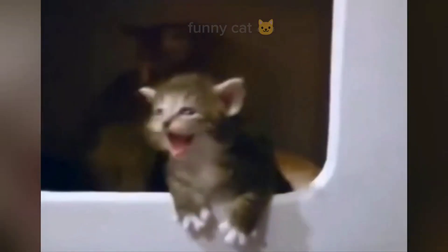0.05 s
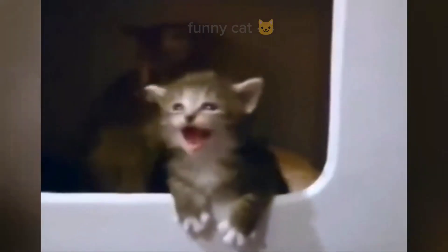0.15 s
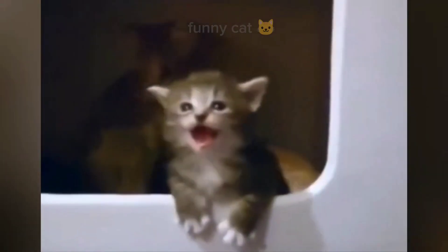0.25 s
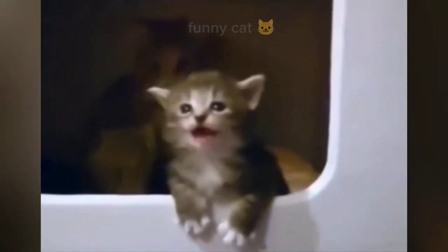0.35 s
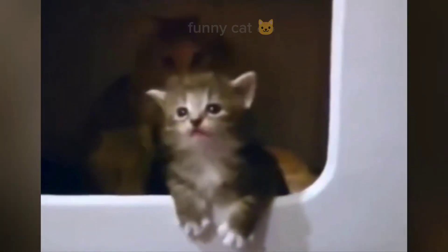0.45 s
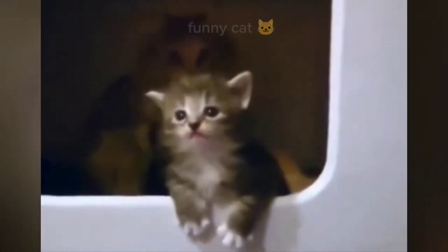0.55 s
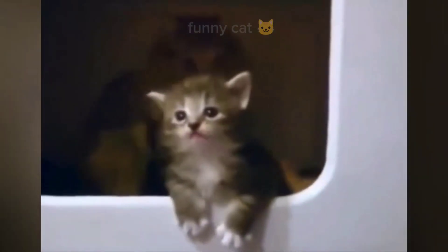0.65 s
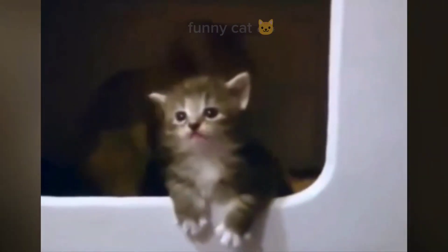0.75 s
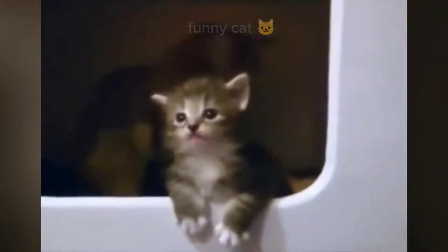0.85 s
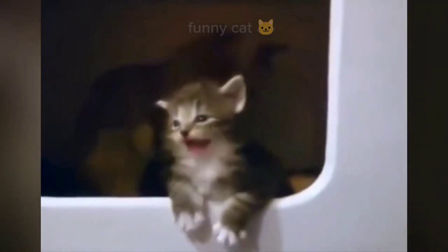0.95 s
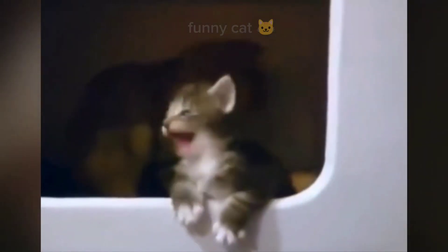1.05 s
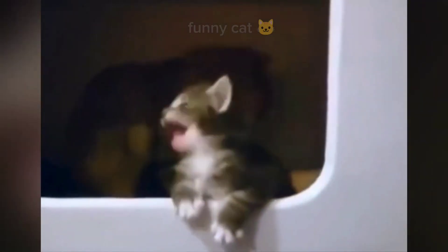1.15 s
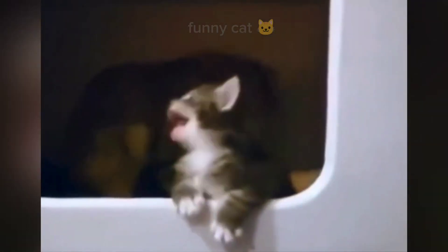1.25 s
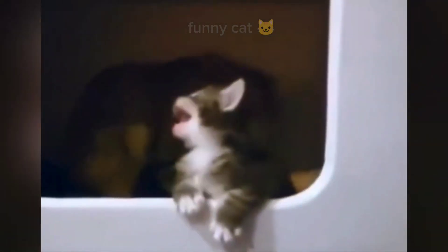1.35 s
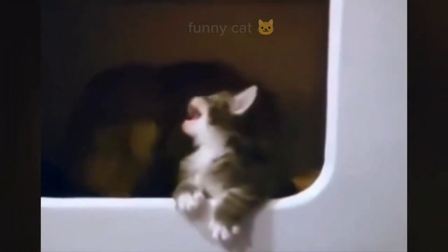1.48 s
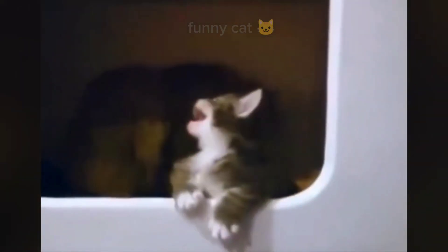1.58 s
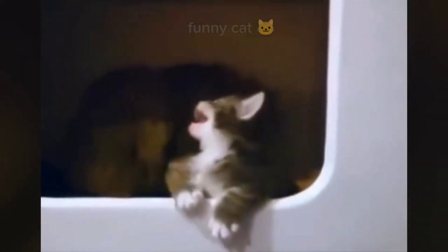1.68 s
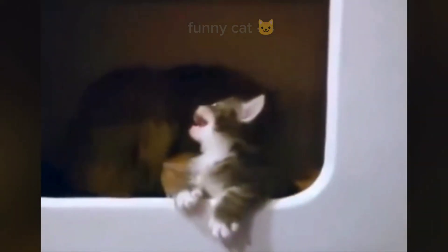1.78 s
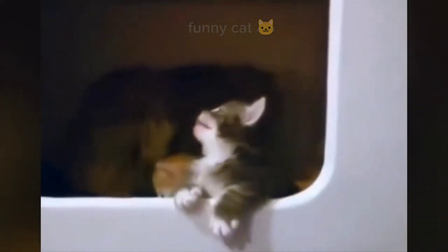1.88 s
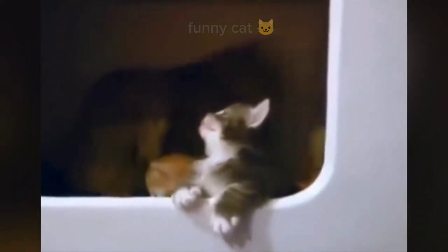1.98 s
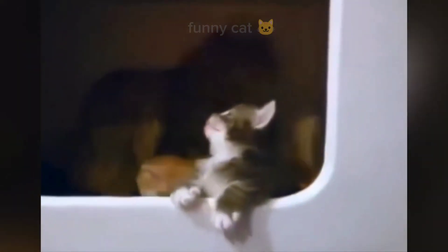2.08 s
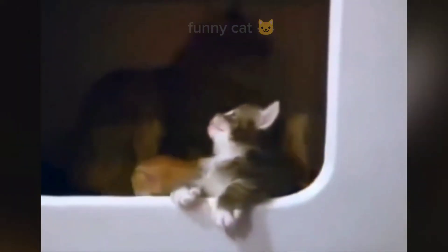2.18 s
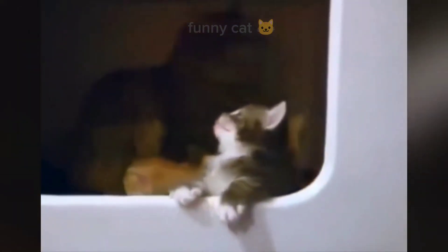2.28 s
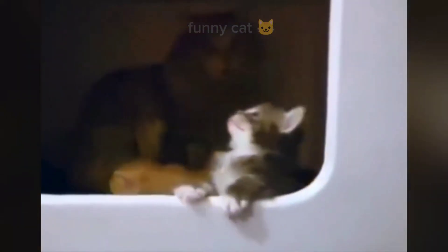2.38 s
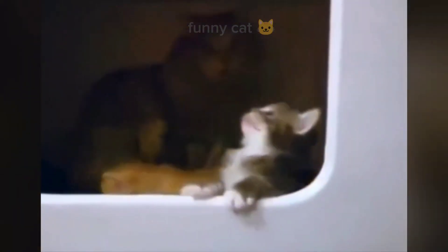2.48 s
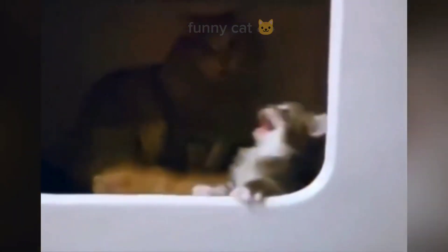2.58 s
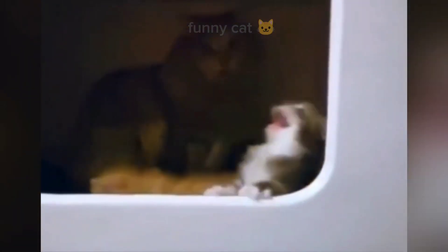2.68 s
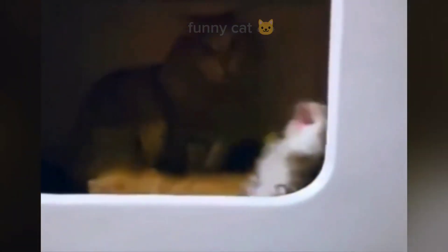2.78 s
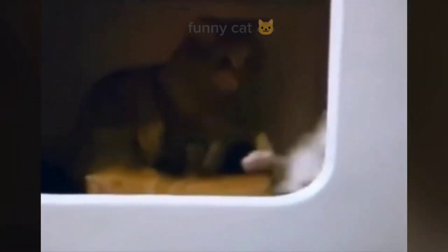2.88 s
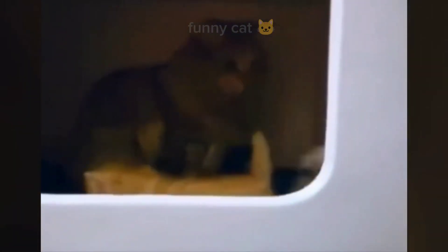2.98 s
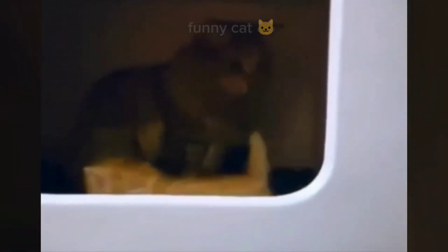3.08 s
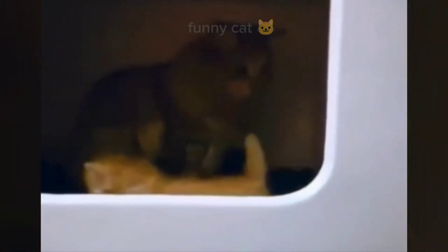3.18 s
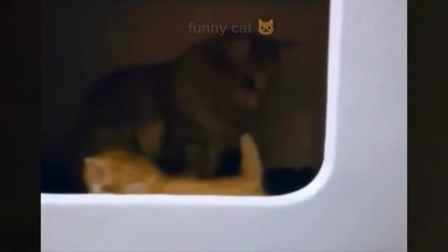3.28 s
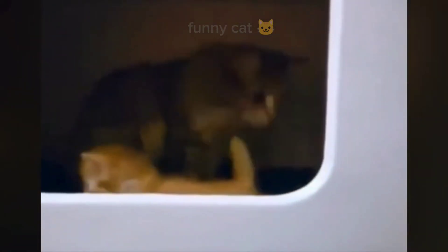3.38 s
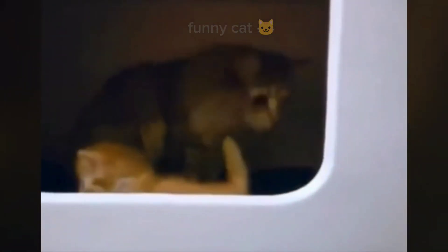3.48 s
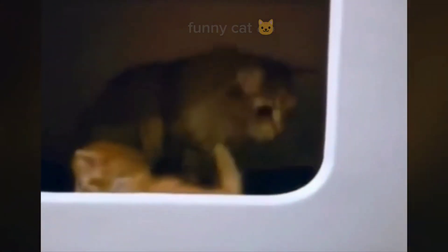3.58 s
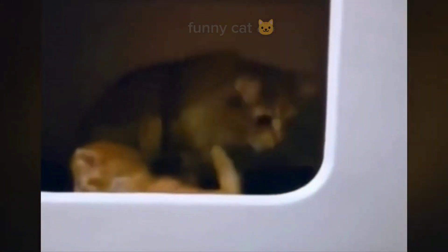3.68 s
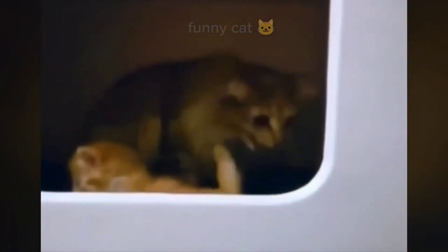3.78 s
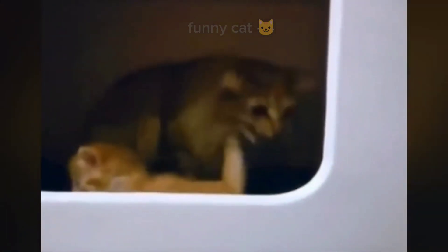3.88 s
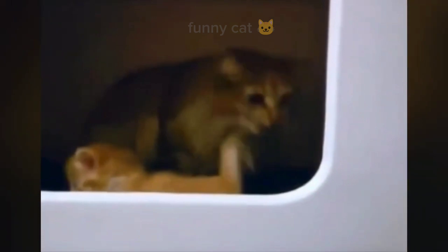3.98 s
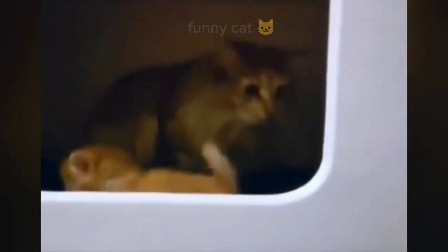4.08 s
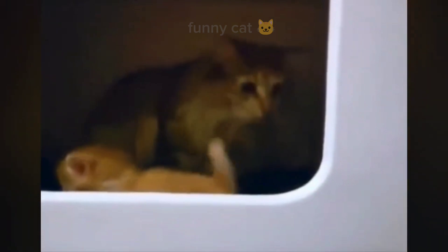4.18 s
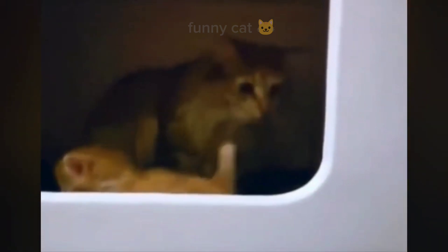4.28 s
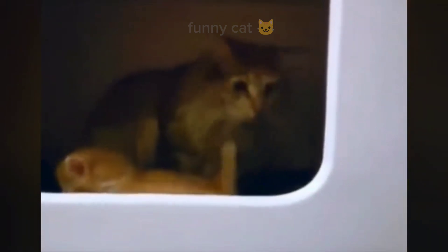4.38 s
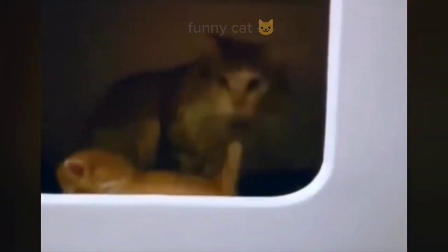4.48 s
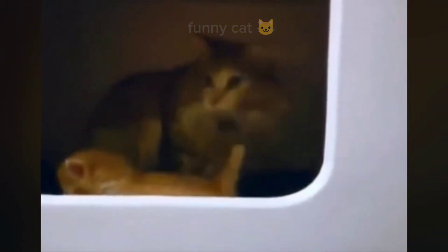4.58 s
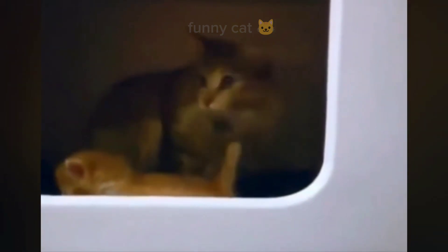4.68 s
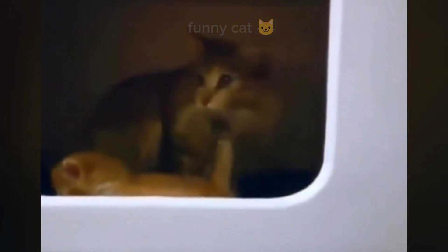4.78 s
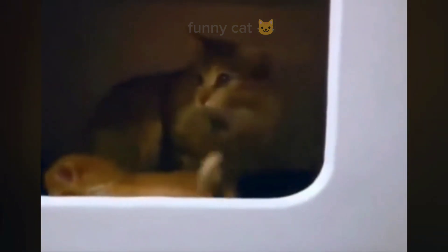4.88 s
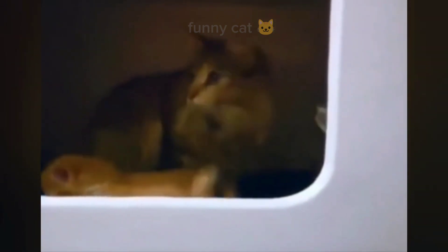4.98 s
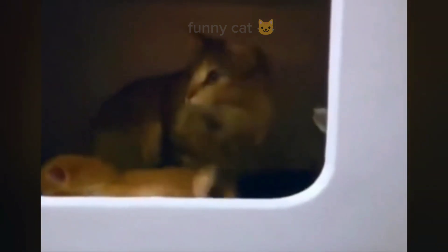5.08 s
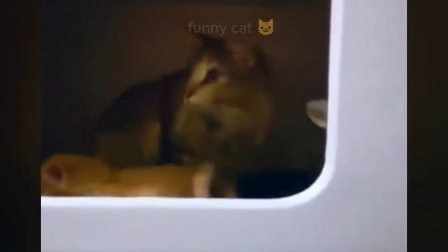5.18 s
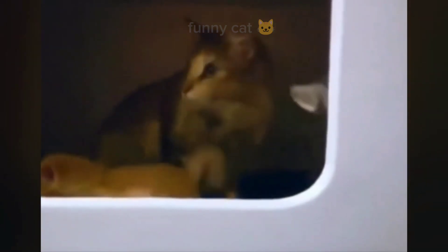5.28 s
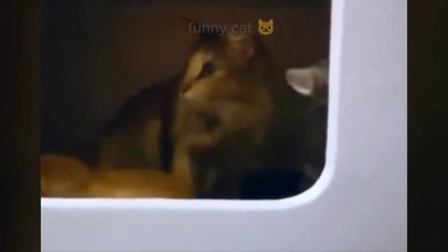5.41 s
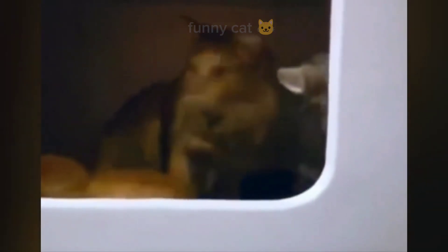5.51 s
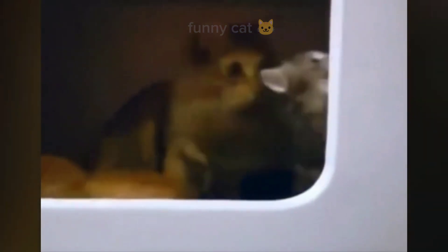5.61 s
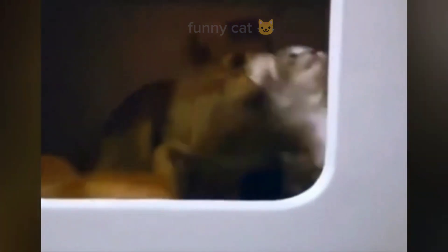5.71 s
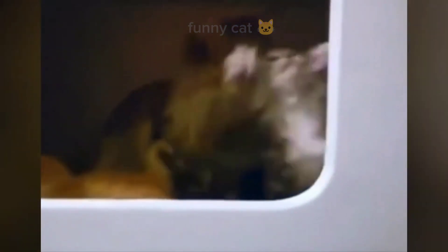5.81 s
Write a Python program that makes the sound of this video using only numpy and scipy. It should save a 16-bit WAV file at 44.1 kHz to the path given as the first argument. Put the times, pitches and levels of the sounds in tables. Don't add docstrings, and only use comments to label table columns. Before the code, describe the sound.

High piercing kitten cries glide up and crack, with fainter kitten answers, a closed-mouth cat trill, soft box thumps and faint hum.

```python
import sys
import numpy as np
from scipy import signal
from scipy.fft import rfft, irfft, next_fast_len
from scipy.io import wavfile
from scipy.ndimage import uniform_filter1d, minimum_filter1d

SR = 44100
rng = np.random.default_rng(int(sys.argv[2]) if len(sys.argv) > 2 else 0)


def amp(db):
    return 10 ** (np.asarray(db, float) / 20)


def write(x):
    x = np.atleast_2d(x).T
    wavfile.write(sys.argv[1], SR, np.round(np.clip(x, -1, 1) * 32767).astype(np.int16))


N = 257984
T = np.arange(N) / SR


def at_hz(points, hz):
    return np.interp(np.log(hz), np.log(np.array(points)[:, 0]), np.array(points)[:, 1])


def rms_one(x):
    return x / np.sqrt(np.mean(x ** 2) + 1e-20)


def drift(rate_hz, size=N):
    r = np.exp(-2 * np.pi * rate_hz / SR)
    settle = 9000
    slow = signal.lfilter([1], [1, -2 * r, r * r], rng.standard_normal(size + settle))
    return rms_one(slow[settle:])


def cycle_phase(hz, jitter):
    return 2 * np.pi * np.cumsum(hz * (1 + jitter)) / SR


def unroll(rows, fade_s):
    s, *columns = np.transpose(rows)
    first, last = s[0] - fade_s, s[-1] + fade_s
    span = slice(max(int(first * SR), 0), min(int(last * SR), N))
    gate = np.interp(T[span], [first, s[0], s[-1], last], [0, 1, 1, 0])
    return span, gate, [np.interp(T[span], s, c) for c in columns]


def partial(phase, db, pan_db, lead_rad):
    left = np.sqrt(1 / (1 + amp(-pan_db) ** 2))
    right = np.sqrt(1 - left ** 2)
    return 2 * amp(db) * np.array([left * np.sin(phase + lead_rad / 2), right * np.sin(phase - lead_rad / 2)])


def coloured(spectrum, patchy_db):
    # frequency in Hz, likeness from -1 to 1.
    likeness = [(60, 1), (280, 0.21), (600, 0.33), (1300, .1), (13000, 0.048)]
    edges_hz = 37.5 * 2 ** np.arange(0, 8.6, .5)
    white = rng.standard_normal((2, 2, N))
    bands = []
    for k, (low, high) in enumerate(zip(edges_hz, edges_hz[1:])):
        centre_hz = np.sqrt(low * high)
        sos = signal.butter(2, [low, high], "band", fs=SR, output="sos")
        mid, side = signal.sosfilt(sos, white[k % 2])
        alike = np.clip(at_hz(likeness, centre_hz), -1, 1)
        gain = amp(at_hz(spectrum, centre_hz) + patchy_db * drift(31))
        bands.append(gain * (np.sqrt(1 + alike) * mid + np.sqrt(1 - alike) * side * [[1], [-1]]))
    return sum(bands) / np.std(sum(bands[8:]))


def scoop(start_s, end_s, low_hz, top_hz, peak_db):
    # share of length, share of climb, effort in dB, mouth opening in dB.
    scoop_shape = [(0, 0.041, -28.5, 6), (.25, .26, -18, 5), (.6, .65, -10.5, 14.5),
                   (0.861, .91, -2.5, 15.5), (.999, 0.98, -12.5, 8)]
    return [(start_s + u * (end_s - start_s), low_hz + climb * (top_hz - low_hz), peak_db + effort, mouth)
            for u, climb, effort, mouth in scoop_shape]


def kitten():
    # start in seconds, end in seconds, from Hz, to Hz, peak in dB.
    scoops = [
        (0.079, 0.176, 962, 1860, -36),
        (1.269, 1.429, 755, 1790, -32.5),
        (2.901, 2.988, 1014, 1745, -34),
        (4.393, 4.507, 1055, 1721, -35.5),
    ]
    # time in seconds, pitch in Hz, effort in dB, mouth in dB.
    holds = [
        [(.17, 1277, -43, 1.5), (.23, 1371, -47, 16.5), (.248, 1513, -32, 6.5), (.29, 1563, -31, 9.5),
         (.36, 1511, -25, 16.5), (.389, 1503, -31.5, 23), (.41, 1477, -29.5, 17), (.447, 1416, -35.5, 30),
         (.469, 1377, -36.5, 24.5)],
        [(1.418, 1297, -60.5, 22.5), (1.439, 1310, -40.5, 12), (1.5, 1413, -41, 17.5),
         (1.556, 1494, -41.5, 26.5), (1.607, 1462, -40.5, 29.5), (1.685, 1425, -37.5, 27),
         (1.706, 1402, -32.5, 24.5), (1.715, 1406, -55, 16)],
        [(2.985, 1207, -61, 21), (3.012, 1347, -37, 7), (3.054, 1417, -40, 19.5), (3.12, 1429, -42.5, 28),
         (3.185, 1403, -39, 29.5), (3.23, 1387, -37, 26), (3.262, 1346, -44.5, 29), (3.297, 1332, -48.5, 26.5)],
        [(4.505, 1166, -58, 15.5), (4.562, 1173, -62, 26), (4.619, 1238, -44.5, -5), (4.645, 1178, -45.5, 10.5),
         (4.668, 1175, -54, 30.5), (4.688, 1200, -45, 5), (4.757, 1105, -44, 0), (4.82, 844, -58, -32)],
    ]
    # time in seconds, pitch in Hz, effort, mouth in dB.
    closings = [
        [(.472, 1575, -28, 3), (.508, 1596, -26, -5), (.55, 1535, -27.5, -9.5), (.6, 1522, -25, -23),
         (.622, 1650, -24, -22), (.648, 1785, -16, -28), (.682, 1640, -27.5, -18), (.705, 1450, -36.5, -3.5),
         (.73, 1200, -59, 13)],
        [(1.716, 1634, -26.5, -8), (1.755, 1592, -36, 3.5), (1.785, 1494, -46.5, 13.5), (1.821, 1474, -36, 4.5),
         (1.941, 1406, -36.5, -1.5), (1.965, 1329, -46.5, 9), (2.061, 1233, -42.5, -3), (2.148, 1100, -49, 11),
         (2.208, 1078, -49.5, 7)],
        [(2.203, 1347, -51, 9.5), (2.22, 1260, -55, 15.5), (2.235, 1134, -67, 2)],
        [(3.298, 1429, -47.5, 26.5), (3.322, 1425, -47, 21.5), (3.345, 1410, -45, 15.5), (3.385, 1404, -45, 5),
         (3.435, 1386, -36, -0.5), (3.466, 1263, -48, 5), (3.523, 1101, -47.5, 8), (3.58, 920, -65, -12.5)],
    ]
    # time in seconds, pitch in Hz, effort in dB, mouth opening in dB.
    last_mew = [
        [(5.355, 818, -47, -37), (5.424, 1096, -44.5, -1), (5.47, 1316, -52, -2)],
        [(5.486, 1333, -42.5, 11), (5.508, 1462, -39, 3.5), (5.547, 1497, -35, 5), (5.584, 1595, -39, 15.5)],
        [(5.587, 1684, -31, 6), (5.615, 1685, -31.5, -2.5), (5.643, 1790, -26.5, -17),
         (5.675, 1775, -24.5, -13.5), (5.703, 1726, -26, -18), (5.73, 1796, -23.5, -21),
         (5.765, 1802, -20.5, -19.5), (5.795, 1712, -25.5, -26), (5.82, 1730, -26, -22.5),
         (5.85, 1630, -29, -18)],
    ]
    flutters = [.4, .55, .25, .45, .03, .02, .02, .28, .1, .1, .15, .4, .18, .25, .45]
    third_lifts_db = [0, -3.5, 2, 13, -1.5, -4, 11.5, 6, -1.5, -11.5, 11, 6.5, 15.5, 0, 0]
    # breath in dB, partial 2 left-right in dB, partials 5-7 in dB,
    # partial 2 left lead in rad, upper partials in dB.
    hoarse = [(-22, -3, 1, -0.3, -54.5), (-18.5, -1, -0.5, 0.6, -62), (-22.5, 11.5, 3, -3.5, -57.5),
              (-11.5, 7.5, -7, 0.5, -64), (-41, 1, 2, 0.92, -41), (-41, -0.5, 5.5, 1.22, -44.5),
              (-40, 0, 3.5, -0.52, -49), (-23, 8.5, -7.5, -2.5, -54.5), (-35, -1, 0, 0.05, -45),
              (-29, 0, -2, 0.1, -52), (-32, -2, -4, 1, -68.5), (-27, 5, -8.5, -0.2, -50),
              (-17.5, 3, -4, -3, -53.5), (-30.5, -1.5, -2.5, 2, -56.5), (-24, 0, 1, 1.05, -54.5)]
    # frequency in Hz, level in dB.
    throat = [(2700, -15.5), (3600, -15), (4050, -10.5), (4500, 4.5), (5400, 1), (6100, -1.5), (7100, -13),
              (9500, -22)]
    # frequency in Hz, density in dB per Hz.
    breath_colour = [(550, -43), (1000, -8), (2650, -7.5), (6100, -18.5), (7400, -45.5)]
    # left-right in dB, left lead in rad.
    upper_sides = [(-12, 2.1), (-4.5, 0.05)]
    # frequency in Hz, left-right in dB, left lead in rad.
    ports = [(2150, 1, 0.22), (2500, 0.5, 0.8), (2660, 3, 0.37), (2770, -3, 1.8), (2950, -5.5, 2.6),
             (3220, -3.5, 2), (3500, -14, 3)]
    # time in seconds, left-
    # right in dB, left lead in rad.
    head_turns = [(.2, -1, 0.19), (.59, -1, -0.4), (.65, -6, 0.27), (0.721, -3, 0.31), (1.5, -1.5, .1),
                  (1.56, -1, 1.8), (1.63, -4.5, .5), (1.7, 0.5, 0.32), (1.73, -9, -1.6), (1.9, -2.5, .2),
                  (2.2, -4, -0.28), (3.0, -1.5, 0.39), (3.3, 1.5, -0.98), (3.45, 1, -0.12), (4.6, 2, 1),
                  (4.75, -2.5, -0.023), (5.5, -6, -0.59), (5.56, 1, .2), (5.582, -6, 1.2),
                  (5.6, 7, -1), (5.625, 8, .2), (5.64, 7, -2), (5.68, 11, -2), (5.71, 11, -2),
                  (5.74, 8.5, -2.7), (5.762, -1.5, -4), (5.8, 20, -2), (5.82, 11, -2)]
    swings = [
        [(.21, 5, 1.0), (.225, 5.5, 1.3), (.245, -10.5, 3.1), (.29, -3, 3.4), (.355, -9.5, 3.0),
         (.385, 1.5, 2.9), (.415, -5, 2.5), (.435, 2, 1.95), (.465, 1.5, 1.7)],
        [(1.44, 5, 1.0), (1.48, 1, 1.6), (1.52, 0, 1.8), (1.55, -1, 2.3), (1.58, -6, 2.3), (1.62, -1, 2.0),
         (1.7, -1, 1.9)],
        [(3.0, 1.5, 0.05), (3.04, 1, .55), (3.07, -4, 1.2), (3.125, -8.5, 1.0), (3.15, -6, .05),
         (3.185, 5.5, .55), (3.21, 0, .8), (3.255, 5.5, .3), (3.29, -4, .1)],
    ]
    # time in seconds, partial 3 in dB, partial 4 in dB.
    tongues = [
        [(.24, -1, -0.5), (.28, 3.5, -9), (.33, 7.5, 4), (.39, 0.5, 12), (.45, 6.5, -2), (.5, -3, 4.5),
         (.6, -7, 5), (.64, 1, -7), (.7, -14, -11)],
        [(1.45, 12.5, -1), (1.55, 0.5, -3), (1.64, 9, -7.5), (1.69, -4, 0.5), (1.75, 4, 3), (1.85, 6.5, 0.5),
         (1.95, 12.5, 2.5), (2.1, 18, -6), (2.2, 13.5, -5)],
        [(3.02, 0.5, -6), (3.1, 2.5, -9), (3.15, 4.5, 11.5), (3.2, -2, -1), (3.28, -9, -5.5), (3.33, -1, -14.5),
         (3.4, 1, -10.5), (3.5, -5, -6.5)],
        [(4.5, -3, -7), (4.62, 15, 4), (4.7, -4, -9.5), (4.8, 0, -11)],
        [(5.36, -13.5, -9), (5.41, 15.5, -14), (5.46, 5.5, 4), (5.52, -1, 6), (5.6, -4, -1), (5.7, 3.5, 2),
         (5.78, 2.5, -3)],
    ]

    out = np.zeros((2, N))
    breath = coloured(breath_colour, patchy_db=4.0)
    head, tongue = np.transpose(head_turns), np.transpose(sum(tongues, []))
    port_hz, port_db, port_rad = np.transpose(ports)
    registers = [scoop(*row) for row in scoops] + holds + closings + last_mew
    for rows, flutter, third_db, tone in zip(registers, flutters, third_lifts_db, hoarse):
        breath_db, turn_db, top_db, lead_rad, upper_db = tone
        span, gate, (hz, effort_db, mouth_db) = unroll(rows, fade_s=0.0038)
        t, size = T[span], len(hz)
        since = t - t[0]
        flutter = flutter + .3 * np.exp(-since / .05) * (flutter < .2)
        phase = cycle_phase(hz, .03 * flutter * drift(35, size))

        loud = np.hypot(amp(effort_db), amp(effort_db + mouth_db))
        upper = upper_db + 0.16 * (20 * np.log10(loud) + 30) + 0.5 * np.exp(-since / 0.054)
        third = third_db + np.interp(t, tongue[0], tongue[1])
        fourth = np.interp(t, tongue[0], tongue[2])
        lifts_db = [third, fourth, top_db, top_db, top_db]
        levels_db = [effort_db, effort_db + mouth_db]
        for k, lift_db in enumerate(lifts_db, start=3):
            levels_db.append(upper + at_hz(throat, k * hz) - 4 * (k - 3) + lift_db)

        first_side = [np.interp(t, head[0], c) for c in head[1:]]
        second_side = [turn_db + np.interp(2 * hz, port_hz, port_db),
                       lead_rad + np.interp(2 * hz, port_hz, port_rad)]
        if rows in holds[:3]:
            swing = np.transpose(swings[holds.index(rows)])
            second_side = [np.interp(t, swing[0], c) for c in swing[1:]]
        sides = [first_side, second_side] + upper_sides

        for k, db in enumerate(levels_db):
            shimmer = 1 - flutter * min(k, 2) * .8 + flutter * (.2 + .65 * k) * drift(70, size)
            if k == 0:
                shimmer = shimmer + .3 * flutter * drift(220, size)
            skirt = [.13, .04, .1 * k + flutter][min(k, 2)]
            shimmer = shimmer + skirt * drift(300 if k > 1 else 25, size)
            out[:, span] += gate * shimmer * partial((k + 1) * phase, db, *sides[min(k, 3)])

        gust_db = 9.5 * np.exp(-since / .07)
        out[:, span] += gate * np.sqrt(loud) * amp(breath_db - 16.5 + gust_db) * breath[:, span]
    return out + strong_weak_cycles()


def strong_weak_cycles():
    # time in seconds, frequency in Hz, level in dB.
    half_line = [(5.62, 2706, -55), (5.642, 2680, -39.5), (5.66, 2660, -56), (5.682, 2615, -36),
                 (5.71, 2570, -52), (5.742, 2574, -30.5), (5.772, 2537, -29.5), (5.79, 2570, -40.5),
                 (5.815, 2503, -36), (5.85, 2470, -50)]
    out = np.zeros((2, N))
    span, gate, (hz, db) = unroll(half_line, fade_s=0.013)
    phase = cycle_phase(hz, .015 * drift(60, len(hz)))
    lines = partial(phase, db + 3.0, 3.3, 1.1) + partial(phase * 5 / 3, db - 21.5, -14, 0.96)
    out[:, span] = gate * (1 + 0.51 * drift(170, len(hz))) * lines
    return out


def linger():
    # start in seconds, frequency in Hz, level in dB, t60 in seconds, left lead in rad.
    ring_ons = [
        (.471, 2780, -22, 0.12, 1.8),
        (1.716, 2826, -23.5, 0.15, 1.8),
        (3.298, 2707, -26, 0.33, .3),
    ]
    out = np.zeros((2, N))
    for s, hz, db, t60_s, lead_rad in ring_ons:
        span = slice(round(s * SR), round(s * SR) + 9000)
        t = T[span] - s
        decay_db = db - 60 * t / t60_s + 2.0 * drift(30, len(t))
        out[:, span] += np.clip(t / .003, 0, 1) * partial(2 * np.pi * hz * t, decay_db, -1.5, lead_rad)
    return out


def litter_mate():
    # start in seconds, length in seconds, pitch in Hz, sag in Hz per second, level in dB.
    answers = [
        (-.1, 0.39, 776, 120, -43.5),
        (1.35, 0.38, 786, 67, -50.5),
        (2.771, 0.33, 746.5, 15, -55.5),
        (4.123, 0.225, 839.4, 264, -45.5),
    ]
    # share of length, pitch ratio, level in dB.
    answer_shape = [(0, .93, -4.5), (0.219, .999, 4), (.5, 1.001, 2.95), (.8, .98, -0.5), (.999, .94, -15)]
    # partial 3 over 1 in dB, lifts in dB of partial 4, 5, 6-7 and 2.
    answer_mouth = [(-7.5, -0.5, -3, -7.5, -1.5), (-8, -2.5, -5, -11.5, 5.5), (7, -8, 5.5, -4, -2.5),
                    (-7.5, 11.5, 14, -8, 9.5)]
    arches = [1, 1, .35, 1]
    # multiple of the pitch, level in dB re partial 3, left-right in dB, left lead in rad.
    mate_partials = [(2, -9, 0, 1.1), (3, -0.5, 2, -0.85), (4, -4, -3, 1.8), (5, -11, -8, -0.54),
                     (6, -10.5, -5, 0.55), (7, -10, -8, 0.18)]
    out = np.zeros((2, N))
    for answer, mouth, arch in zip(answers, answer_mouth, arches):
        start_s, length_s, pitch_hz, sag, level_db = answer
        open_db, fourth_db, fifth_db, top_db, second_db = mouth
        rows = [(start_s + u * length_s, ratio ** arch * pitch_hz - sag * (u - .5) * length_s, level_db + db)
                for u, ratio, db in answer_shape]
        span, gate, (hz, first_db) = unroll(rows, fade_s=0.0075)
        size = len(hz)
        phase = cycle_phase(hz, .006 * drift(45, size))
        lifts_db = {2: second_db, 3: 0, 4: fourth_db, 5: fifth_db, 6: top_db, 7: top_db}
        voice = partial(phase, first_db, -4.0, 0.24)
        for k, db, pan_db, lead_rad in mate_partials:
            shimmer = 1 + .4 * drift(55, size) + .33 * drift(11, size)
            partial_db = first_db + open_db + db + lifts_db[round(k)]
            voice += shimmer * partial(round(k) * phase, partial_db, pan_db, lead_rad)
        out[:, span] += gate * voice
    return out


def mother():
    # time in seconds, pitch in Hz, partial 1 in dB, partial 2 in dB.
    trills = [
        [(2.63, 440, -62, -75), (2.76, 445, -57.5, -75), (2.86, 440, -68, -73), (3.0, 440, -53.5, -71.5),
         (3.15, 442, -59.5, -72), (3.3, 438, -56.5, -73)],
        [(3.675, 492, -52, -69.5), (3.731, 529, -50, -58.5), (3.742, 520, -69, -51)],
        [(3.795, 504.4, -48.5, -50), (3.85, 511.7, -48, -44), (3.936, 503.6, -47, -48), (3.965, 462, -52, -52),
         (3.995, 381, -46.5, -62), (4.025, 362, -56.5, -71)],
    ]
    roll_hz, depth = 43.0, .9
    out = np.zeros((2, N))
    for rows in trills:
        span, gate, (hz, first_db, second_db) = unroll(rows, fade_s=0.00627)
        roll = np.cos(2 * np.pi * roll_hz * (T[span] - 3.815))
        phase = cycle_phase(hz, .085 * roll + .015 * drift(40, len(hz)))
        voice = (1 - 0.18 * depth * roll) * partial(phase, first_db + 3.5, -3.0, 0.22)
        voice += (1 + depth * roll) * partial(2 * phase, second_db - 3.5, -1.4, 0.16)
        out[:, span] = gate * voice * (1 + 0.15 * drift(58, len(hz)))
    return out


def rustle():
    # centre in seconds, length in seconds, level in dB, centre frequency in Hz.
    brushes = [(0.736, 0.081, -47, 4980), (1.27, 0.06, -54.5, 5090), (2.287, 0.07, -57, 5080),
               (2.673, 0.054, -56.5, 495), (2.762, 0.2, -49.5, 2430), (2.795, .36, -55, 260),
               (2.92, 0.083, -41.5, 1890), (2.985, 0.94, -56.5, 2450), (3.167, 0.5, -46.5, 371),
               (3.386, 0.066, -40.5, 820), (3.442, 0.17, -44.5, 3500), (3.567, 0.11, -48, 1790),
               (3.662, 0.33, -59.5, 2950), (3.842, 0.55, -47.5, 1500), (4.047, 0.22, -51, 2720),
               (4.308, 0.94, -50.5, 3160), (4.347, 0.15, -43, 2360), (4.417, 0.13, -51, 3960),
               (4.802, 0.11, -51, 2500), (4.94, 0.045, -53, 2590), (4.999, .71, -62.5, 2400),
               (5.205, 0.11, -54, 4310), (5.438, 0.3, -48, 2950), (0.203, .22, -48, 4530),
               (1.437, 0.082, -45.5, 4400), (3.019, .09, -49, 4000), (4.2, .26, -69.5, 2500)]
    out = np.zeros((2, N))
    for s, length_s, db, hz in brushes:
        size = min(round(length_s * SR), SR)
        start = round(s * SR) - size // 2
        white = rng.standard_normal((3, SR))[:, :size]
        sos = signal.butter(2, [hz / 4.2, min(hz * 1.5, 6800)], "band", fs=SR, output="sos")
        band = signal.sosfilt(sos, 0.42 * white[0] + white[1:])
        clumps = amp(db + 0.76 * drift(30, SR)[:size])
        out[:, start:start + size] += clumps * np.hanning(size) * rms_one(band)
    return out


def paws():
    # start in seconds, peak in dB, ring in Hz, t60 in seconds.
    thumps = [
        (1.119, -60.5, 96.6, 0.07),
        (2.547, -68.5, 91.2, 0.07),
        (3.373, -37.5, 443, 0.28),
        (3.411, -27, 165.6, 0.12),
        (3.455, -27.5, 148, 0.084),
        (3.748, -39, 90, 0.16),
        (4.5, -42, 105.7, 0.35),
    ]
    out = np.zeros(N)
    for s, db, hz, t60_s in thumps:
        span = slice(round(s * SR), round(s * SR) + 8000)
        t = np.maximum(T[span] - s, 0)
        shape = amp(-60 * t / t60_s) * (1 - np.exp(-t / 0.0037))
        out[span] += amp(db + 4.0) * shape * (np.sin(2 * np.pi * hz * t) + 0.31 * drift(470, len(t)))
    return out * amp([[-1.5], [1.5]])


def room(x):
    t60_s, wall_cut_hz = 0.21, 5000
    size = next_fast_len(N + SR)
    w = 2 * np.pi * np.arange(size // 2 + 1) / size
    dull = 1 / (1 + 1j * w * SR / (2 * np.pi * wall_cut_hz * 4))
    loops = [amp(-60 * lag_s / t60_s) * dull * np.exp(-1j * w * lag_s * SR)
             for lag_s in np.geomspace(.0083, .0331, 16)]
    echoes = [sum((-1) ** k * g / (1 - g) for k, g in enumerate(loops[c::2])) for c in range(2)]
    return irfft(rfft(x[::-1], size) * echoes, size)[:, :N]


def appliance():
    # frequency in Hz, level in dB rms.
    hum_lines = [
        (49, -55.5),
        (100, -47),
    ]
    # frequency in Hz, width in Hz, level in dB.
    whirs = [
        (477.2, 70, -63.5),
        (547.7, 40, -58),
    ]
    # frequency in Hz, density in dB per Hz.
    hiss_colour = [(45, -18), (75, -10.5), (150, -19.5), (300, -29.5), (550, -25), (750, -36), (5100, -45),
                   (6800, -51), (7600, -72), (11400, -46), (13500, -52)]
    hiss_db = -63
    hum = np.zeros(N)
    for hz, db in hum_lines:
        level = np.sqrt(2) * amp(db + 2.0 * drift(2.7))
        hum += level * np.sin(2 * np.pi * hz * T + 1.0 * drift(2.1))
    for hz, width_hz, db in whirs:
        r = np.exp(-np.pi * width_hz / SR)
        poles = [1, -2 * r * np.cos(2 * np.pi * hz / SR), r * r]
        once = signal.lfilter([1, 0, -1], poles, rng.standard_normal(N))
        hum += amp(db) * rms_one(signal.lfilter([1], poles, once))
    return hum * amp([[-1.3], [1.3]]) + amp(hiss_db) * coloured(hiss_colour, patchy_db=.8)


def rebuilt_top(x):
    # frequency in Hz, level in dB re the voice.
    fillers = [(8958, -50), (10163, -53)]
    # start in seconds, end in seconds, frequency in Hz, level in dB.
    steady_filler = (2.93, 3.3, 10163, -68)
    shift_hz, copy_db, haze_db = 18 * SR / 128, -14.5, -60
    air_hz, air_db = 11600, 3
    band = signal.sosfilt(signal.butter(8, [3900, 7600], "band", fs=SR, output="sos"), x)
    strength = np.abs(uniform_filter1d(band ** 2, size=1024)) ** 0.17
    band = (.6 * band + .05 * band[::-1])[::-1]
    evened = band * amp(-6.5) / (strength + .012) ** 0.35
    haze = strength * signal.lfilter([.5, -1, .5], 1, rng.standard_normal(N))
    both = evened * 2 * np.cos(2 * np.pi * shift_hz * T) + amp(haze_db - copy_db + 16.5) * haze
    copy = signal.sosfilt(signal.butter(8, 9400, "high", fs=SR, output="sos"), both)
    air = signal.sosfiltfilt(signal.butter(2, air_hz, "high", fs=SR, output="sos"), copy * 0.58 / 0.58)
    copy = 0.58 * copy + amp(air_db) * air

    start_s, end_s, tone_hz, tone_db = steady_filler
    gate = np.interp(T, [start_s, start_s + .03, end_s - .03, end_s], [0, 1, 1, 0])
    copy = copy + amp(tone_db - copy_db) * gate * np.sin(2 * np.pi * tone_hz * T)
    loud = np.sqrt(uniform_filter1d(np.mean(x ** 2, axis=0), size=2048) + 1e-12)
    tones = sum(amp(db) * loud * np.sin(2 * np.pi * hz * T) for hz, db in fillers)
    return amp(copy_db) * copy + tones


def masked(x):
    mask_db, up_db_per_khz, down_db_per_khz = -39.5, 2.3, 81
    valley_db, top_opens_s = 18, .09
    hz, s, z = signal.stft(x, SR, nperseg=2048)
    level = 10 * np.log10(np.add.reduceat(abs(z) ** 2, np.arange(0, 1025, 16), axis=1) + 1e-14)
    khz = hz[::16] / 1000
    column = khz[:, None]
    above = column - khz
    fall = np.where(above > 0, up_db_per_khz * above, -down_db_per_khz * above)
    fall = fall + 99 * (khz < 1)
    spread = np.max(level[:, None] - fall[None, :, :, None], axis=2) + mask_db
    near_peak = -minimum_filter1d(-level, size=5, axis=1)
    spread = np.maximum(spread, near_peak - valley_db - 99 * (column < 3.2)) - 9.0 * (column < 2.6)

    patches = uniform_filter1d(rng.standard_normal(level.shape[1:]), size=6)
    starved = patches > .46 - .4 * (abs(column - 7.6) < 1.7) - .25 * (column > 9.3)
    faint = level < level[:, 3:].max(axis=1, keepdims=True) - 8
    no_peak = level < uniform_filter1d(level, size=3, axis=1) + 2.5
    spread = np.where(starved & faint & no_peak, 0, spread)
    keep = np.where(column > 1.6, 1 / (1 + np.exp(np.clip(spread - level, -30, 30))), 1)
    keep = keep * ((column < 6.7) | (s > top_opens_s))
    return signal.istft(z * np.repeat(keep, 16, axis=1)[:, :1025], SR, nperseg=2048)[1][:, :N]


def scene():
    voices = kitten() + linger() + litter_mate() + mother()
    near = voices + amp(-19) * room(voices) + rustle()
    return near + rebuilt_top(near) + paws() + appliance()


def band_limit(x):
    return signal.sosfilt(signal.butter(12, 13650, fs=SR, output="sos"), x)


def record(dry):
    low_pass = signal.cheby2(12, 60, 13900, fs=SR, output="sos")
    return band_limit(signal.sosfilt(low_pass, masked(dry)))


dry = scene()
out = record(dry)
write(out)
```